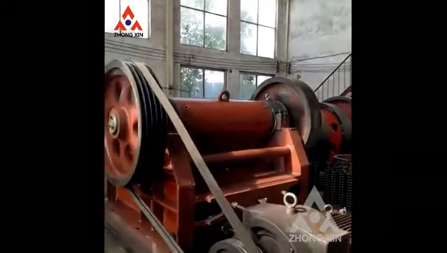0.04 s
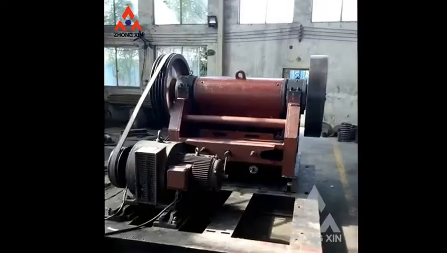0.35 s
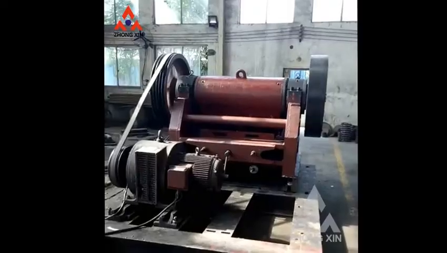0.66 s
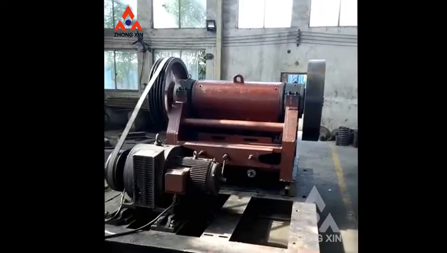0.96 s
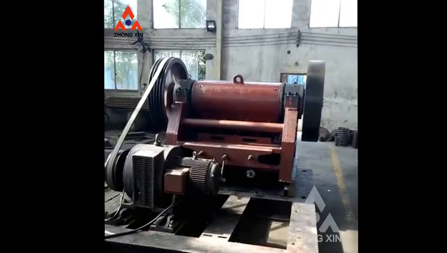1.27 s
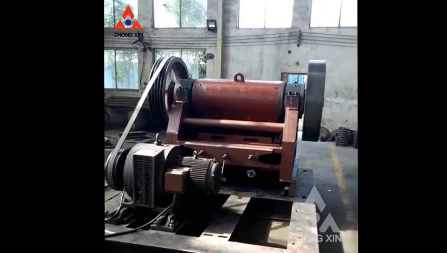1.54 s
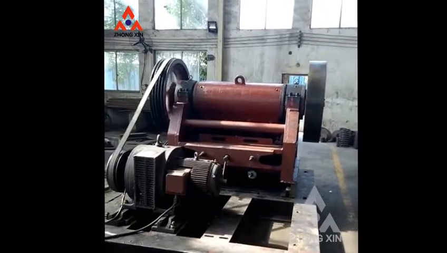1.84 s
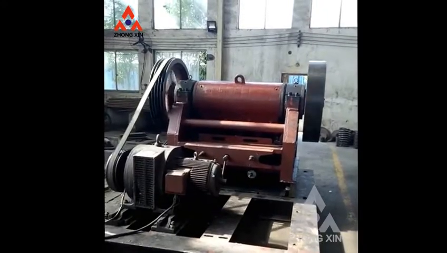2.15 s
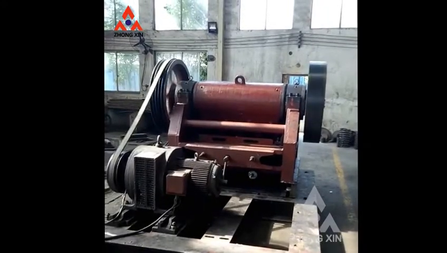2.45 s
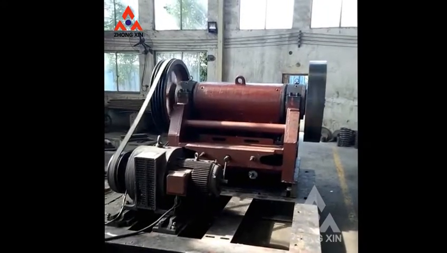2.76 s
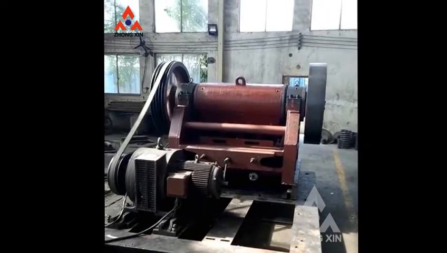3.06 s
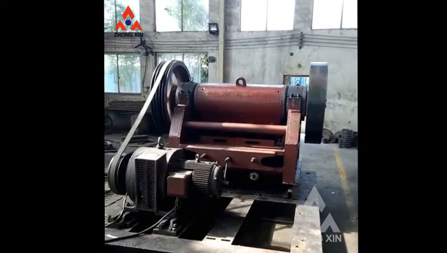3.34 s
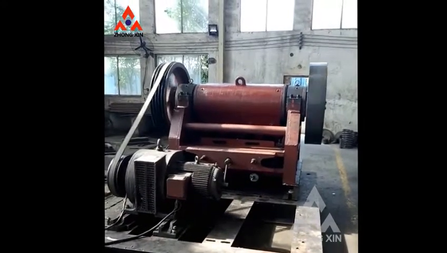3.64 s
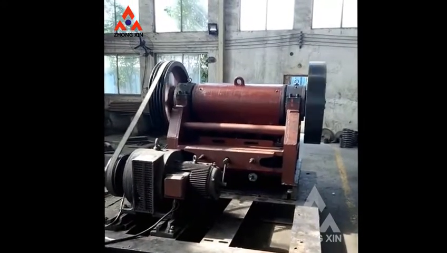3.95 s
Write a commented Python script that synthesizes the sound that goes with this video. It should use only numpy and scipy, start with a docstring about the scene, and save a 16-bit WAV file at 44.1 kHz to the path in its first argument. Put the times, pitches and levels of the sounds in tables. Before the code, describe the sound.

A belt-driven crusher idles with a throbbing drone, low rumble, dense metal chatter and irregular clanks. It opens with a split-second close burst and a brief gap, then continues from a few metres off with short workshop reverberation.

```python
"""A bright, close burst of machine chatter cuts to silence after a tenth of a second. Then it fades
back in, a few metres from the microphone: a belt-driven jaw crusher running empty in a concrete workshop.
The drive drones and throbs, the motor hums, and bearings and flywheels make the frame rumble.
Loose steel parts chatter, swelling slightly with each turn of crank, belt and motor, and play in the
jaw linkage knocks unevenly. Chatter and knocks ring the frame and carry the room's short tail."""
import sys
import numpy as np
from scipy import signal
from scipy.fft import rfft, irfft
from scipy.io import wavfile
from scipy.ndimage import uniform_filter1d

SR = 44100
rng = np.random.default_rng(int(sys.argv[2]) if len(sys.argv) > 2 else 0)


def store_wav(level_fs):
    """Save 16-bit WAV to argv[1]."""
    pcm = np.round(np.clip(np.atleast_2d(level_fs), -1, 1) * 32767)
    wavfile.write(sys.argv[1], SR, pcm.T.astype(np.int16))


N = 176400
CUT_S = 0.108  # the close opening ends here

# Tone colour of the steel parts: frequency_hz, gain_db
STEEL_COLOUR = [(100, -19), (300, -4), (480, -0.5), (660, -1.5), (820, .5), (1000, 0.5), (1250, 1),
                (1450, -2), (2150, -3.5), (2800, -6), (3950, -9), (5000, -17), (6900, -30.5), (8000, -44),
                (13000, -68)]
# Resonances of frame and guards, added to that colour: pitch_hz, width_hz, relative_db
FRAME_MODES = [(425, 20, 1), (524, 16, -1), (776, 40, -4.5), (891, 62, -1.5), (1242, 24, -11.5),
               (1520, 17, -8), (1990, 55, -5), (2206, 36, -7), (2524, 38, -7.5), (3460, 50, -10),
               (3920, 140, -9.5)]


def undb(db):
    """Decibels to gain."""
    return 10 ** (np.asarray(db) / 20)


def unit(x):
    """Scale to rms 1."""
    return x / np.sqrt(np.mean(x ** 2))


def drift(rate_hz):
    """Smooth random drift with rms 1."""
    hold = max(int(SR / rate_hz), 2)
    steps = rng.standard_normal(1000)[np.arange(N) // hold % 1000]
    return unit(uniform_filter1d(uniform_filter1d(steps, hold), hold // 2))


def colour(x, points, modes=()):
    """Causal filter from (Hz, dB) points and resonances; white input keeps its level."""
    freqs = np.arange(N + 1) * SR / (2 * N)
    point_hz, point_db = np.array(points, float).T
    gain = undb(np.interp(np.log(freqs + 1), np.log(point_hz), point_db))
    gain *= 1 + sum(undb(db) / (1 + (2 * (freqs - hz) / width) ** 2) for hz, width, db in modes)
    cepstrum = irfft(np.log(unit(gain)))[:N]
    cepstrum[1:] *= 2  # minimum phase: the ringing follows each hit
    return irfft(rfft(x, 2 * N) * np.exp(rfft(cepstrum, 2 * N)))[:N]


def workshop(x, t60_s=0.41, tail_db=-0.5):
    """Direct sound plus the concrete room's diffuse tail, whose energy follows the impacts and dies."""
    t = np.arange(N) / SR
    decay = np.exp(-2 * np.log(1000) * t / t60_s)
    energy = np.abs(irfft(rfft(x ** 2) * rfft(decay / decay.sum()), N))
    tail = undb(tail_db) * np.sqrt(energy) * rng.standard_normal(N)
    return (x + tail) / np.hypot(1, undb(tail_db))


def drive_drone(t):
    """The drive's low tone wobbles and throbs; its near octave comes and goes in slower swells."""
    # Throb of the low tone: time_s, level_db
    throb = [(0.28, -36), (0.4, -21.5), (0.44, -38), (0.46, -24), (0.51, -32), (0.57, -22.5), (0.66, -31.5),
             (0.75, -22.5), (0.79, -30), (0.84, -24), (0.88, -33), (1.04, -28), (1.09, -35), (1.21, -31.5),
             (1.23, -39), (1.31, -22.5), (1.33, -26.5), (1.5, -23.5), (1.53, -31), (1.68, -27), (1.76, -31),
             (1.85, -29), (1.9, -40), (1.95, -24.0), (1.99, -29), (2.03, -19.5), (2.1, -31.5), (2.21, -28),
             (2.24, -39), (2.32, -28.5), (2.39, -22), (2.43, -29), (2.48, -26), (2.54, -35), (2.58, -26),
             (2.67, -33.5), (2.77, -19), (2.8, -35), (2.85, -20), (2.88, -31), (2.94, -21), (3.05, -31.0),
             (3.1, -22.0), (3.17, -28.5), (3.26, -26), (3.32, -25), (3.37, -40), (3.41, -20.5),
             (3.48, -31.5), (3.51, -35.0), (3.61, -21.5), (3.76, -41), (3.79, -21), (3.83, -27),
             (3.85, -43), (3.94, -34), (3.97, -20.5), (4.0, -25)]
    # Swells of the octave: time_s, level_db
    swells = [(0.28, -34), (0.55, -30), (0.8, -39), (0.99, -42), (1.11, -20), (1.23, -41), (1.29, -27),
              (1.83, -28.5), (2.08, -37), (2.22, -32.5), (2.37, -42), (2.4, -33), (2.53, -28.5),
              (2.68, -40.5), (2.89, -28), (3.47, -38), (3.67, -25.5), (3.79, -34), (3.87, -28), (4.0, -36)]
    low_db = np.where(t < CUT_S, -45.5, np.interp(t, *np.array(throb).T) + 0.8)
    octave_db = np.where(t < CUT_S, -25, np.interp(t, *np.array(swells).T) + 1)
    low_hz, octave_hz = 145.9, 289.6
    # each tone wavers in phase and flutters in level
    low = np.sin(2 * np.pi * low_hz * t + 0.67 * drift(30)) * (1 + 0.11 * drift(45))
    octave = np.sin(2 * np.pi * octave_hz * t + 1.05 * drift(14)) * (1 + 0.34 * drift(24))
    return unit(low) * undb(low_db) + unit(octave) * undb(octave_db)


def motor_hum(t):
    """The motor holds faint, steady low tones under the drone."""
    # Tones of the motor: pitch_hz, level_db
    tones = [(49.8, -58.5), (76.9, -48.5), (101, -56)]
    return sum(undb(db) * unit(np.sin(2 * np.pi * (hz * t + rng.random()))) for hz, db in tones)


def shaking_load(t):
    """Load on frame and loose parts, in dB: it swings once per turn of crank, belt and motor."""
    # Turning parts: rate_hz, offset_s, swing_db
    crank, belt, motor = (3.1, 0.3, 0.44), (5.45, 0.15, -0.39), (24.9, 0.0072, 0.16)
    return sum(db * np.cos(2 * np.pi * hz * (t - offset)) for hz, offset, db in (crank, belt, motor))


def frame_rumble(load_db, level_db=-26):
    """Bearings and flywheels shake the heavy frame."""
    # Spectrum of the rumble: frequency_hz, gain_db
    spectrum = [(15, -10.5), (28, -15.5), (39, -20), (60, -11.5), (80, -9), (112, -2), (145, -1), (185, 0),
                (250, -0.5), (310, -1), (420, -5), (530, -9), (700, -16.5), (1500, -59.5)]
    return colour(rng.standard_normal(N), spectrum) * undb(level_db + load_db + 0.2 * drift(25.55))


def steel_chatter(t, load_db, hits_per_s=2600, spread_db=2, level_db=-27.5):
    """Dense small impacts of loose steel ring the frame, harder when the load peaks."""
    hits = (rng.random(N) < hits_per_s / SR) * rng.choice([-1, 1], N)
    strength = undb(spread_db * rng.standard_normal(N))
    impacts = workshop(unit(hits * strength))
    force_db = level_db + load_db + 0.27 * drift(45) - 0.5 * (t < CUT_S)
    return colour(impacts * undb(force_db), STEEL_COLOUR, FRAME_MODES)


def close_treble(t, level_db=-31.5):
    """A bright rush, heard only in the opening, with the microphone close to the machine."""
    # Extra treble close up: frequency_hz, gain_db
    spectrum = [(1000, -6), (4200, 6.5), (6500, -13), (8000, -20), (10000, -22.5), (13500, -33)]
    return colour(rng.standard_normal(N), spectrum) * undb(level_db) * (t < CUT_S)


def hiss(level_db=-60):
    """A faint, even hiss lies behind the machine."""
    # Spectrum of the hiss: frequency_hz, gain_db
    spectrum = [(1000, 7), (8000, 1), (11500, 2.5), (13200, 9), (14000, 10)]
    return colour(rng.standard_normal(N), spectrum) * undb(level_db)


def linkage_knocks(t, attack_s=0.0051, decay_s=0.017, split_hz=2020):
    """Play in the jaw linkage closes with a short rattling blow: a dull body and a bright clink."""
    # Blows of the linkage: start_s, body_db, clink_db
    blows = [(0.492, -28, -31), (0.654, -27, -34), (0.812, -27, -31.5), (0.958, -32, -32.5),
             (1.088, -30, -44.5), (1.132, -26, -30), (1.159, -32, -40.5), (1.204, -29, -31.5),
             (1.362, -33, -34.5), (1.533, -30, -36.5), (1.562, -36, -41), (1.719, -39.5, -34.0),
             (1.768, -27, -36.5), (1.91, -29.5, -32), (1.972, -30, -37.5), (2.073, -27.5, -36.5),
             (2.133, -24, -29.5), (2.404, -31, -36.5), (2.452, -26.5, -43.5), (2.496, -32.0, -39.5),
             (2.674, -27.5, -35), (2.784, -26, -36.5), (2.85, -30.0, -34), (2.912, -27, -46),
             (3.002, -34, -32), (3.185, -44, -33.5), (3.257, -30, -33), (3.332, -29.5, -33),
             (3.37, -29.5, -36.5), (3.41, -27, -40.5), (3.574, -34.5, -37.5), (3.763, -32.5, -33),
             (3.828, -27, -34.5), (3.922, -33.5, -36)]
    body_trim_db, clink_trim_db = 4.5, 4
    body_energy, clink_energy, knocks = np.zeros((3, N))
    for start_s, body_db, clink_db in blows:
        age = np.maximum(t - start_s, 0)
        envelope = np.minimum(age / attack_s, 1) * np.exp(-np.maximum(age - attack_s, 0) / decay_s)
        body_energy += (envelope * undb(body_db + body_trim_db)) ** 2
        clink_energy += (envelope * undb(clink_db + clink_trim_db)) ** 2
    for energy, side in (body_energy, "low"), (clink_energy, "high"):
        rattle = np.sqrt(energy) * rng.standard_normal(N)
        ring = colour(workshop(rattle), STEEL_COLOUR, FRAME_MODES)
        band = signal.butter(2, split_hz, side, fs=SR, output="sos")
        knocks += np.sqrt(energy.mean()) * unit(signal.sosfilt(band, ring))
    return knocks


def scene():
    """The whole crusher at one microphone, close by at first and then a few metres off."""
    t = np.arange(N) / SR
    load_db = shaking_load(t)
    air = close_treble(t) + hiss()
    drive = drive_drone(t) + motor_hum(t)
    frame = frame_rumble(load_db) + steel_chatter(t, load_db) + linkage_knocks(t)
    return (air + drive + frame)[None]


def record(dry):
    """The sound cuts out, fades quickly back in, and loses its top to a steep low-pass."""
    resume_s, fade_s, start_gain, top_hz = 0.21, 0.1, 0.13, 13900
    t = np.arange(N) / SR
    fade_in = (t > resume_s) * np.clip((t - resume_s) / fade_s, start_gain, 1)
    fader = (t < CUT_S) + fade_in
    lowpass = signal.ellip(10, 0.2, 80, top_hz, fs=SR, output="sos")
    return signal.sosfilt(lowpass, dry * fader)


dry = scene()
out = record(dry)
store_wav(out)
```